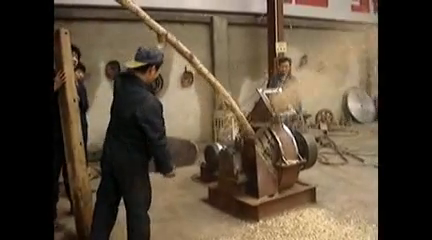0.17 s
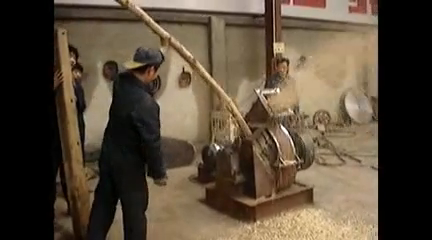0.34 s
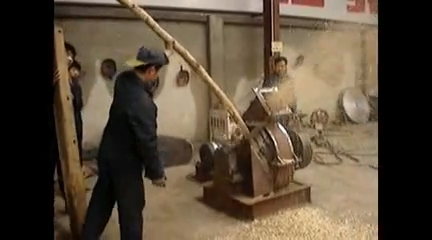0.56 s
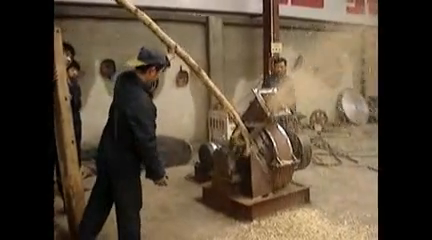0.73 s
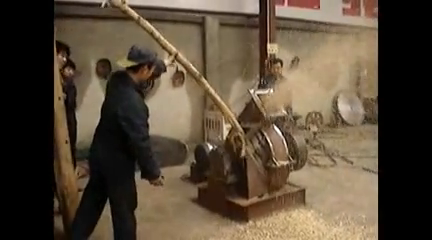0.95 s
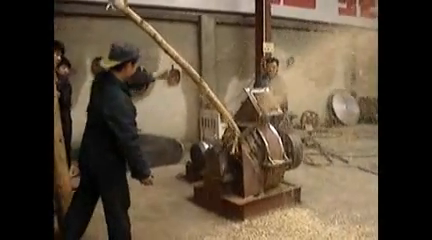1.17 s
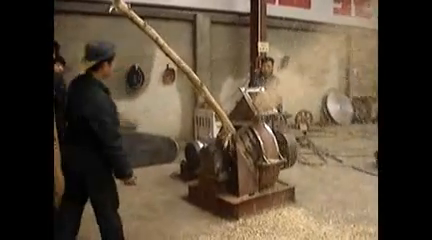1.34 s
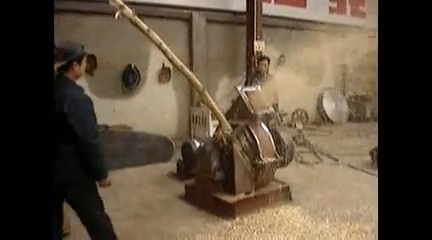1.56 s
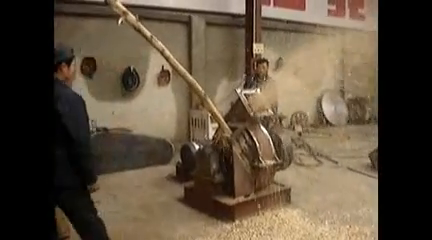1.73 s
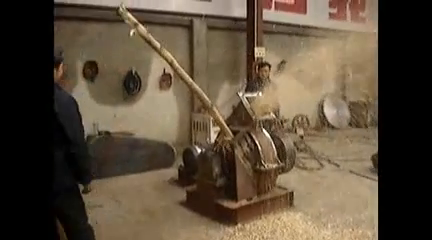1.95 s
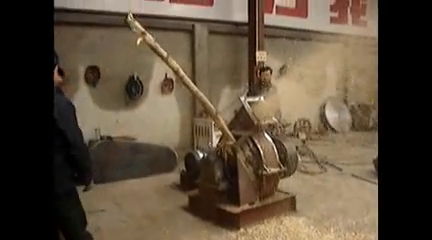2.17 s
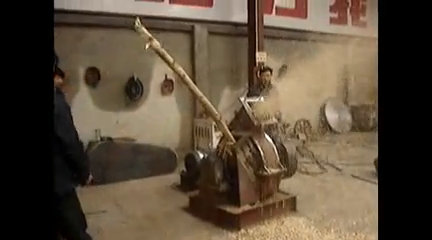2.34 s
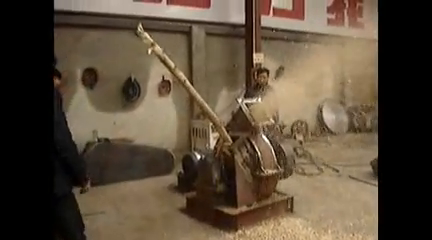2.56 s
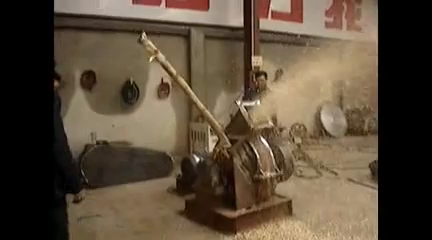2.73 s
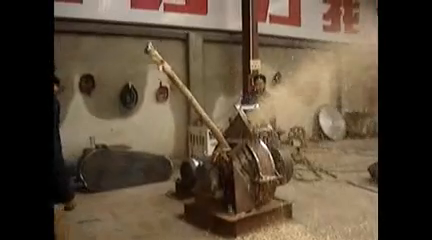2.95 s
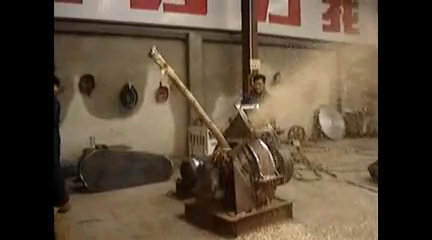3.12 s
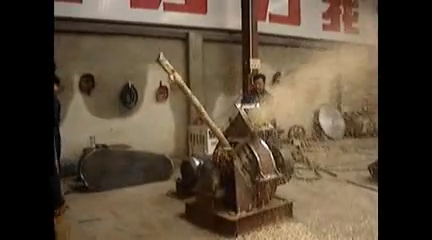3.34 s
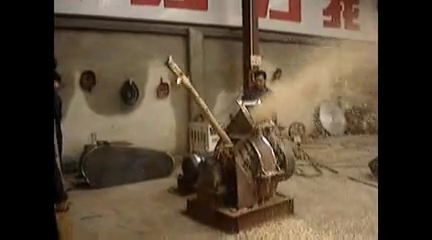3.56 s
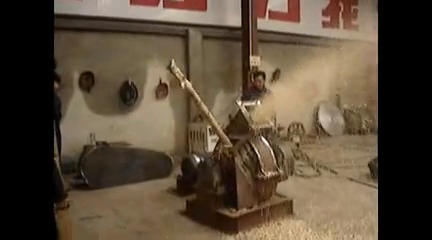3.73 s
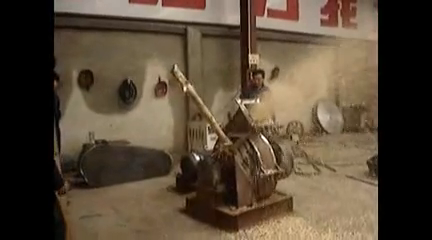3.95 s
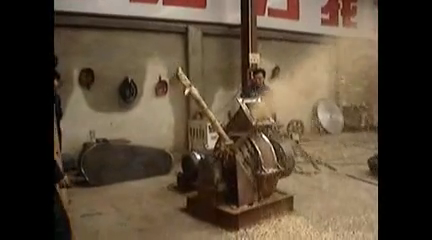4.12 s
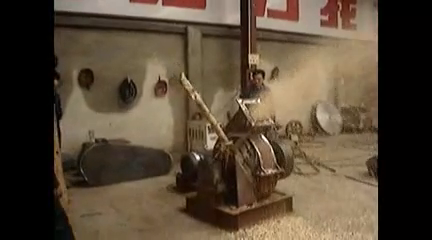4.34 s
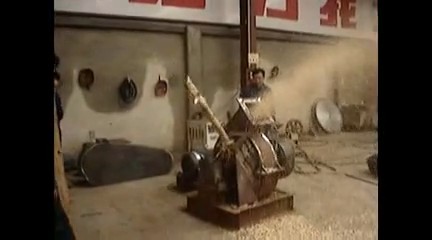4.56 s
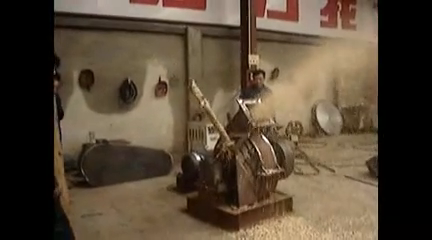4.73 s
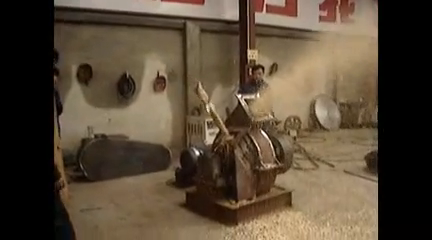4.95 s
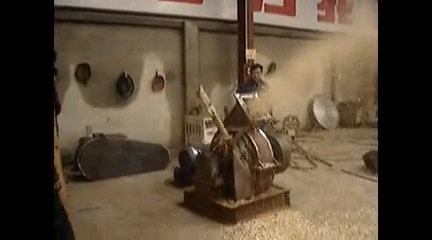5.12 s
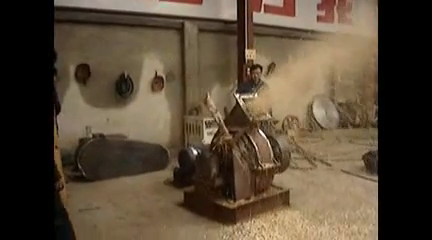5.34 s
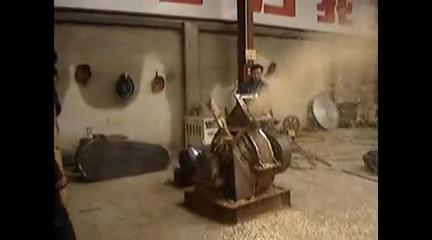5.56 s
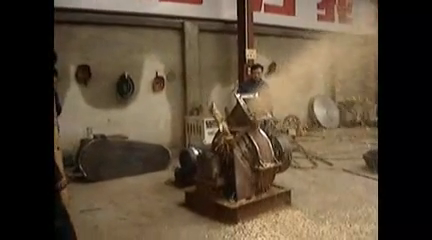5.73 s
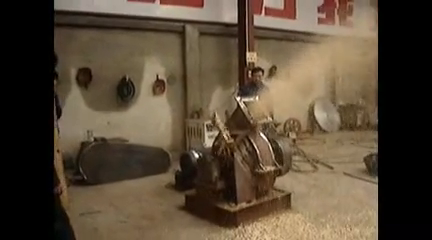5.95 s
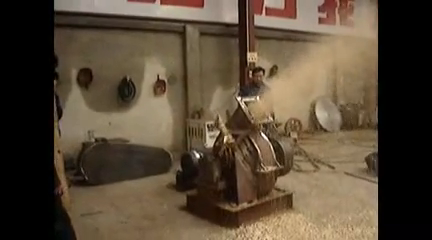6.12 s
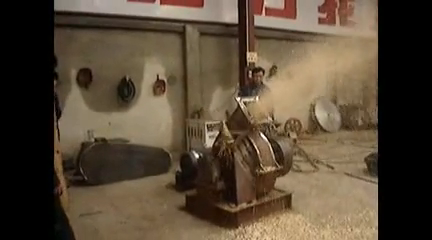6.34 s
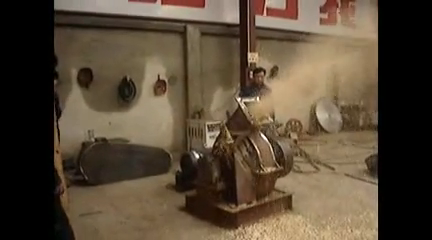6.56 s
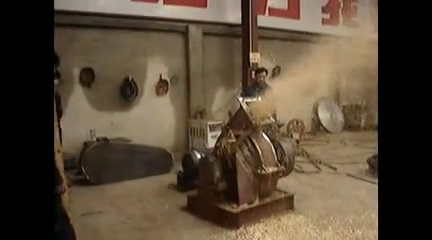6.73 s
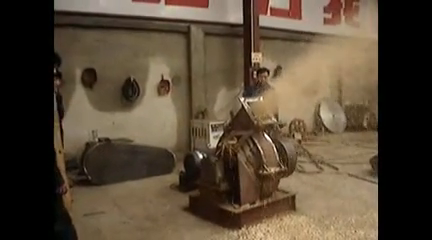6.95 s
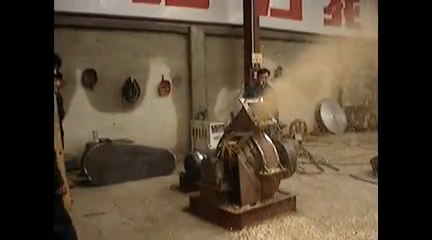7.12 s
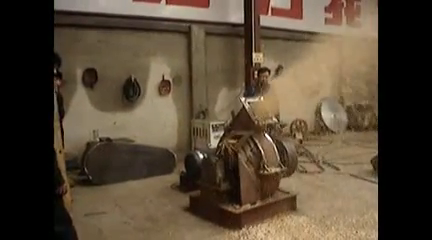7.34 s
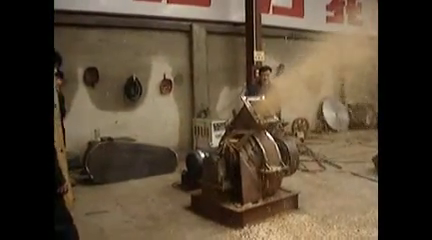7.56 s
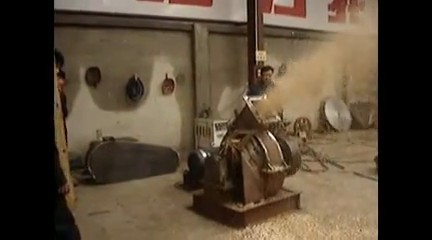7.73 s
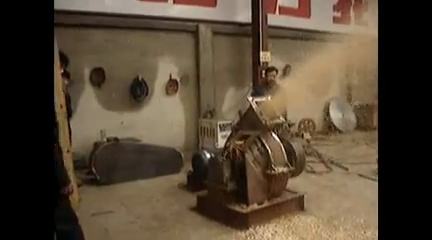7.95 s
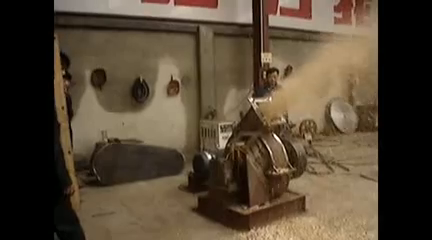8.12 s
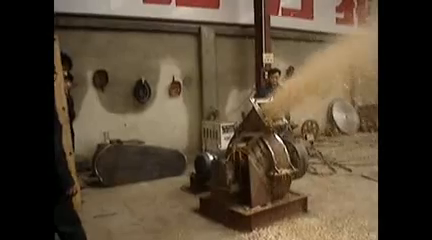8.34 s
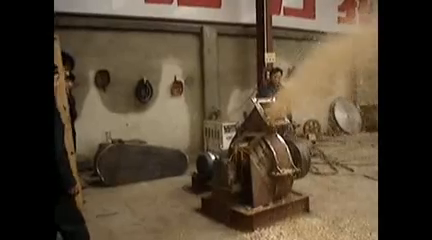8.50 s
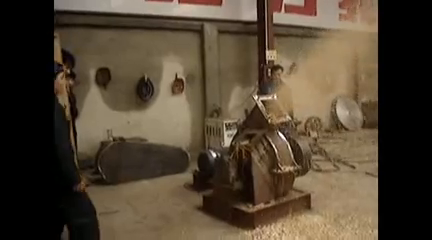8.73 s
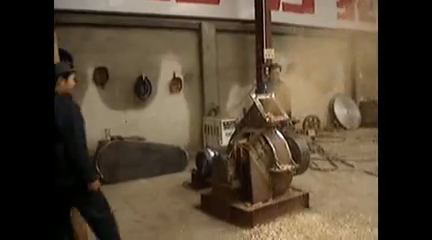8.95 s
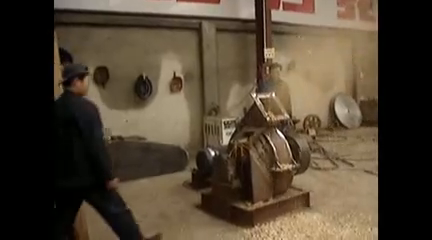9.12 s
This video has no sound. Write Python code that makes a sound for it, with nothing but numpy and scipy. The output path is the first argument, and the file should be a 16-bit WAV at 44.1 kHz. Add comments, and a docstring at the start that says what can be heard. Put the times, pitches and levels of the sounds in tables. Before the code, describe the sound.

From 0 s a large chipper is at full load, shredding a wooden pole: a loud, coarse, noisy grind chopped about 40 times a second, with a low throb and rumble beneath. Sharp cracks come thick and irregular until about 4.5 s, with crisp splinters spraying on steel. A thin whine near 1.1 kHz wavers, sagging slightly around 1 s and recovering by 3 s. From 3 to 5 s the pole groans with sliding, fuzzy resonances. Around 5-6.5 s chunks break in short ripping surges and cracks thin out. From 6.5 s the loose stub is batted round the ringing housing, about fourteen knocks a second, over a hollow drone and howl. Bright bursts cluster at 7.5-8.4 s, then cutting fades; quick light clanks run from 8.6 s as the disk speeds up to 9.3 s. Mono, a few metres away, echoing workshop, about one second of reverberation.

```python
"""In a workshop, a few metres from a mono microphone, a three-knife disk chipper eats a wooden pole.
Noise-like fibre fractures, pulsed by the knife passes and coloured by the steel housing, make the cutting.
Tones locked to the knife rate make the disk's drone; a gliding sine makes the motor's whine.
Near the end the loose stub is batted round the housing, the cutting fades and the disk speeds up."""
import sys
import numpy as np
from scipy import signal
from scipy.fft import rfft, irfft, next_fast_len
from scipy.io import wavfile
from scipy.ndimage import map_coordinates

SR = 44100
rng = np.random.default_rng(int(sys.argv[2]) if len(sys.argv) > 2 else 0)


def transcribe(signal):
    """Save signal, clipped to [-1, 1], as a 16-bit WAV file at the path in sys.argv[1]."""
    frames = np.atleast_2d(signal).T
    limited = np.clip(frames, -1, 1)
    pcm = np.round(limited * 32767).astype(np.int16)
    wavfile.write(sys.argv[1], SR, pcm)


N = 409248


def amp(db):
    """Amplitude ratio of a level in dB."""
    return 10 ** (np.asarray(db) / 20)


def unit(x):
    """x scaled to rms 1."""
    return x / np.sqrt(np.mean(x ** 2) + 1e-20)


def along(points, hz):
    """(Hz, value) points joined along a log frequency axis."""
    f, v = np.transpose(points)
    return np.interp(np.log(hz + 1), np.log(f + 1), v)


def curves(rows):
    """One value per sample for each column after the time."""
    s, *cols = np.transpose(rows)
    return [np.interp(np.arange(N) / SR, s, c) for c in cols]


def wobble(rate):
    """A smooth random curve with `rate` knots a second."""
    knots = rng.standard_normal(int(N * rate / SR) + 4)
    return map_coordinates(knots, [np.arange(N) * rate / SR])


def swells(rows, attack, release):
    """Sum of (start s, length s, height) bouts, each with a straight attack, a hold and a release."""
    t = np.arange(N) / SR
    total = np.zeros(N)
    for s, length, height in rows:
        rise = np.clip((t - s) / attack, 0, 1)
        fall = np.clip(1 - (t - s - length) / release, 0, 1)
        total += height * rise * fall
    return total


def bouts(rows, attack, release, rest_db):
    """Gain of a tone that rises from its resting level in (start s, length s, dB) bouts."""
    heights = [(s, length, amp(db)) for s, length, db in rows]
    return np.hypot(amp(rest_db), swells(heights, attack, release))


def add_at(track, s, sound):
    """Lay a short sound into the track at s seconds."""
    track[round(s * SR):][:len(sound)] += sound


def fuzzy(hz, width):
    """A resonance shaken at random: narrow noise around a steady or gliding frequency, rms 1."""
    phase = 2 * np.pi * np.cumsum(hz + np.zeros(N)) / SR
    return unit(wobble(width) * np.cos(phase) + wobble(width) * np.sin(phase))


def drone(passes, orders, waver_db, drift):
    """Lines on multiples of the knife rate, each wavering in level and phase in the turbulent air."""
    total = np.zeros(N)
    for k, db in orders:
        phase = 2 * np.pi * (k * passes + rng.random()) + drift * wobble(9)
        total += amp(db + waver_db * wobble(7)) * np.sin(phase)
    return total


def coloured(x, gain, size=16384):
    """Causal minimum-phase filter of unit energy with the given gain over frequency."""
    log_gain = np.log(np.maximum(gain(np.fft.rfftfreq(size, 1 / SR)), 1e-6))
    cepstrum = irfft(log_gain)
    # fold the cepstrum forward in time
    cepstrum[1:size // 2] *= 2
    cepstrum[size // 2 + 1:] = 0
    response = irfft(np.exp(rfft(cepstrum)))
    return signal.fftconvolve(x, response / np.linalg.norm(response))[:N]


# Reverberation of the workshop. Each row: frequency in Hz, time to fall 60 dB in seconds.
WORKSHOP_DECAY = [(150, 0.96), (1000, 1), (4000, 0.8), (9000, 1)]


def hall(x, wet_db, size=11025):
    """Direct sound plus the workshop's echo, redrawn every quarter second; the power stays about the same."""
    blocks = np.pad(x, (0, -N % size)).reshape(-1, size)
    hz, t, z = signal.stft(rng.standard_normal((len(blocks), SR // 2)), SR, nperseg=256)
    decay = amp(-60 * t / along(WORKSHOP_DECAY, hz)[:, None])
    tails = signal.istft(z * decay, SR, nperseg=256)[1]
    echo = np.zeros(N + 2 * SR)
    for i, answer in enumerate(signal.fftconvolve(blocks, tails, axes=1)):
        echo[i * size + SR // 200:][:len(answer)] += answer  # the echo starts 5 ms late
    wet = amp(wet_db) * np.std(x) * unit(echo[:N])
    return (x + wet) / np.hypot(1, amp(wet_db))


# Resonances of the steel housing. Each row: frequency in Hz, width in Hz, level in dB.
HOUSING_MODES = [(544, 62, 1), (587, 14, 2.5), (884, 66, -1), (1180, 19, -6), (1540, 230, 3),
                 (2296, 110, -4.5), (2850, 34, -7.5), (3120, 65, 4), (3300, 37, -3.5), (3640, 280, -2.5)]


def housed(x, spectrum, ring):
    """x takes a broad colour, and the housing's resonances stand out of it."""
    def gain(f):
        steel = sum(amp(db) / (1 + (2 * (f - hz) / width) ** 2) for hz, width, db in HOUSING_MODES)
        return amp(along(spectrum, f)) * (1 + ring * steel)
    return coloured(x, gain)


# Low rumble in the base frame. Each row: frequency in Hz, spectrum in dB per Hz.
RUMBLE_SPECTRUM = [(10, -11.5), (25, 3.5), (45, -10), (65, -13.5), (110, 1.5), (160, 7.5), (300, -23),
                   (600, -61.5)]
# The whine sags under load. Each row: time in seconds, pitch in Hz.
WHINE_PITCH_HZ = [(0, 1115), (.25, 1113), (.9, 1089), (1.2, 1087), (1.75, 1090), (2.2, 1094), (2.55, 1111),
                  (3, 1116), (9.28, 1113)]
# The whine swells in bouts. Each row: start in seconds, length in seconds, level in dB.
WHINE_BOUTS = [(-.05, 0.26, -34.5), (.3, 0.1, -41), (.52, .05, -43), (.61, 0.06, -35.5), (.72, .03, -38),
               (.8, 0.14, -32.5), (.99, 0.07, -34.5), (1.13, 0.16, -33.5), (1.33, .05, -36.5),
               (1.46, 0.25, -32), (1.79, 0.08, -40.5), (1.92, 0.08, -37), (2.04, .08, -34.5),
               (2.19, 0.08, -42), (2.29, .12, -37), (2.45, 0.43, -35.3), (2.92, 0.1, -39.5),
               (3.08, 0.33, -44), (3.5, 0.2, -36.5), (3.76, 0.38, -37), (4.14, 0.58, -43.5),
               (5.23, .08, -41), (6.05, 0.3, -44), (8.63, 0.035, -44), (8.09, 0.08, -37.5), (8.2, .38, -36)]
WHINE_ATTACK_S, WHINE_RELEASE_S, WHINE_REST_DB = 0.028, 0.097, -55
WHINE_CHOP = 0.099  # depth to which the knife passes chop the whine
WHINE_FRINGE_DB, WHINE_FRINGE_HZ = -18.5, 70.3  # its rough fringe: level re the tone, noise knots a second
MOTOR_ORDER = .73  # throbs of the shaft per knife pass


def motor(passes):
    """The loaded motor whines, roughened by the knife strokes; its shaft throbs and shakes the base frame."""
    pitch_hz, = curves(WHINE_PITCH_HZ)
    ragged = amp(.6 * wobble(22) + 1.5 * wobble(70))
    flutter = ragged * (1 + WHINE_CHOP * np.cos(2 * np.pi * (passes - .6)))
    tone = np.sin(2 * np.pi * np.cumsum(pitch_hz) / SR + 0.29 * wobble(30))
    tone += amp(WHINE_FRINGE_DB) * fuzzy(pitch_hz, WHINE_FRINGE_HZ)
    swell = bouts(WHINE_BOUTS, WHINE_ATTACK_S, WHINE_RELEASE_S, WHINE_REST_DB)
    whine = swell * flutter * tone
    throb = amp(-67.5 + 1.5 * wobble(5)) * np.sin(2 * np.pi * MOTOR_ORDER * passes)
    rumble = amp(-61.5) * coloured(rng.standard_normal(N), lambda f: amp(along(RUMBLE_SPECTRUM, f)))
    return whine + throb + rumble


# How hard the wood is pressed on the knives. Each row: time in seconds, effort in dB.
PRESSING_EFFORT = [(0, 2), (0.42, -1), (0.9, 2), (1.1, -0.5), (2.3, 0), (2.52, -2.5), (3.03, -1), (3.2, 1),
                   (3.95, -0.5), (4.25, 1), (4.85, 0.5), (5.0, -2.5), (6.1, -1), (6.52, -4), (6.65, -0.5),
                   (7.5, -1), (7.76, -1.5), (8.55, 2.5)]
# The frame answers the knife blows. Each row: multiple of the knife rate, level in dB.
FRAME_ORDERS = [(2, -15), (3, -6), (4, -6.5), (5, -6.5), (6, -2.5), (7, -4), (8, 0.5), (9, -4)]
FRAME_DB = -55  # at 0 dB effort
ENTRIES_END_S = 6.1  # the last snap of a knife entering the pole


def frame(passes):
    """The evenly spaced blows shake the base frame into a low, unsteady burr that fades after the last entry."""
    effort_db, = curves(PRESSING_EFFORT)
    held = np.clip(ENTRIES_END_S + 1 - np.arange(N) / SR, 0, 1)
    burr = drone(passes, FRAME_ORDERS, waver_db=1.5, drift=0.29)
    return held * amp(FRAME_DB + 0.78 * effort_db) * burr


# Loudness of the disk's drone. Each row: time in seconds, level in dB.
DRONE_LEVEL = [(0, -53.5), (2.35, -58.5), (3.3, -71), (3.85, -45), (4.2, -52), (6.45, -54), (6.65, -44.5),
               (7.8, -46), (8.25, -56), (8.5, -59)]
# Lines of the drone. Each row: multiple of the knife rate, level in dB.
DRONE_ORDERS = [(3, -22), (4, -10), (5, 0), (6, -4), (7, -10.5), (8, -7), (9, -1.5), (10, -16.5), (11, -11),
                (12, -4.5)]
# Air howls through the housing in bouts. Each row: start in seconds, length in seconds, level in dB.
HOWL_BOUTS = [(3.8, 0.19, -48), (7.0, 0.62, -46.5), (7.86, 0.2, -38), (8.25, 0.25, -47)]
HOWL_ATTACK_S, HOWL_RELEASE_S, HOWL_REST_DB = 0.055, 0.2, -60
# Lines of the howl. Each row: multiple of the knife rate, level in dB.
HOWL_ORDERS = [(12, 0), (14, -8), (21, -5.5)]
# Level of the disk's ringing, strongest around 8.15 s. Each row: time in seconds, level in dB.
RINGING_LEVEL = [(0, -56.5), (6.5, -63.5), (7.5, -60), (8.15, -47.5), (8.5, -56), (8.9, -57), (9.28, -51)]
# The disk's own modes. Each row: frequency in Hz, level in dB.
MODES_OF_DISK = [(495, -0.5), (661, -2.5), (868, 0), (1163, 0.5), (1985, -5), (2133, 0), (2347, -4),
                 (2510, -7.5), (2888, -10.5), (3297, -1), (3468, -4.5), (8015, -10)]
# Air rushing round the disk. Each row: frequency in Hz, spectrum in dB per Hz.
WINDAGE_SPECTRUM = [(300, -8.5), (600, 1), (2300, -1), (4500, -2), (8000, -1), (9000, -27.5)]
WINDAGE_DB = -52


def disk(passes):
    """The spinning disk drones, drives air through the housing and rings with its own modes."""
    hum = amp(curves(DRONE_LEVEL)[0]) * drone(passes, DRONE_ORDERS, waver_db=2.2, drift=0.22)
    howl_gain = bouts(HOWL_BOUTS, HOWL_ATTACK_S, HOWL_RELEASE_S, HOWL_REST_DB)
    howl = howl_gain * drone(passes, HOWL_ORDERS, waver_db=3.5, drift=0.26)
    modes = sum(amp(db) * fuzzy(hz, width=8 + .005 * hz) for hz, db in MODES_OF_DISK)
    ring = amp(curves(RINGING_LEVEL)[0]) * modes
    windage = amp(WINDAGE_DB) * housed(rng.standard_normal(N), WINDAGE_SPECTRUM, ring=0.34)
    return hum + howl + ring + windage


# The three knives stand out unequally. Each row: cutting force in dB, splinters in dB.
KNIFE_UNEVENNESS = [(0, 1), (-1.5, -3.5), (0, 1)]
KNIVES = 3


def knife_strokes(passes, knife_db, deepest, rise, fall, scatter_db):
    """Cutting force, rms 1: it builds to the deepest point of each pass and dies, unequally for each knife."""
    stroke = np.floor(passes).astype(int)
    count = np.arange(stroke[-1] + 1)
    size = amp(knife_db[count % KNIVES] + scatter_db * rng.standard_normal(len(count)))
    lag = passes - stroke - deepest
    return unit(size[stroke] * np.exp(np.minimum(lag / rise, -lag / fall)))


# The pole groans as it chatters in the chute. Each row: start in seconds, length in seconds,
# first pitch in Hz, last pitch in Hz, fuzziness in noise knots a second, level in dB.
POLE_GROANS = [(0.448, 0.46, 342, 299, 327, -40.5), (0.7, 0.79, 793, 765, 91, -45),
               (2.146, 0.436, 288.7, 261, 199, -44), (2.15, .35, 151.4, 136, 78, -57),
               (3.057, 1.36, 1318, 1493, 198.8, -42), (3.401, 0.85, 936, 870, 169.6, -38.5),
               (3.598, 0.42, 1154, 1253, 503, -45), (4.251, 0.7, 1333, 1517, 404, -46),
               (5.757, 0.44, 600, 690, 240.8, -41), (5.79, 0.11, 1510, 1485, 170, -40),
               (6.135, 0.25, 953, 1134, 400, -34), (6.169, .22, 1480, 1590, 231, -43),
               (6.489, 0.17, 1100, 1324, 189.5, -41.5), (6.599, .13, 1340, 1490, 190, -40),
               (6.901, 0.81, 638, 745.4, 352.4, -39)]


def groans(passes):
    """The knives shake the pole against the chute, and its resonance slides up or down."""
    t = np.arange(N) / SR
    sound = np.zeros(N)
    for s, length, first_hz, last_hz, width, db in POLE_GROANS:
        u = np.clip((t - s) / length, 0, 1)
        glide_hz = first_hz + u * (last_hz - first_hz)
        sound += amp(db) * np.sin(np.pi * u) * fuzzy(glide_hz, width)
    chatter = .25  # share of the power that follows the strokes
    force_db = np.transpose(KNIFE_UNEVENNESS)[0]
    force = knife_strokes(passes, force_db, deepest=.45, rise=0.13, fall=0.082, scatter_db=5.5)
    return sound * np.sqrt(1 - chatter + chatter * force ** 2)


SNAP_AT, SNAP_JITTER = .42, .04  # how far into its pass a knife splits the wood, and the spread (passes)
SNAP_SCATTER_DB = 0.5


def entries(passes):
    """(s, relative dB) of each knife's entry into the pole up to ENTRIES_END_S, stronger with effort."""
    stroke = np.arange(int(passes[-1]))
    chance = rng.standard_normal((len(stroke), 2))
    when = np.interp(stroke + SNAP_AT + SNAP_JITTER * chance[:, 0], passes, np.arange(N) / SR)
    level_db = np.transpose(KNIFE_UNEVENNESS)[0][stroke % KNIVES]
    level_db = level_db + np.interp(when, *np.transpose(PRESSING_EFFORT)) * .5
    level_db += SNAP_SCATTER_DB * chance[:, 1]
    return [(s, db) for s, db in zip(when, level_db) if s < ENTRIES_END_S]


# Treble ticks: base level, middle pitch, its relative spread, time to fall 20 dB
TICK_DB, TICK_HZ, TICK_SPREAD, TICK_S = -32, 6077, .11, 0.011
TREBLE_FADE_DB_PER_S = 0.82  # ticks and splinters slowly weaken as the pole shortens


def ticks(passes, count=3):
    """Short high-pitched ticks, a few at each knife stroke, at random pitches around 6 kHz."""
    t = np.arange(SR // 40) / SR
    onset = 1 - np.exp(-t / 0.0026)
    sound = np.zeros(N + SR)
    for s, db in entries(passes):
        for late, pitch, size in rng.standard_normal((count, 3)):
            level_db = TICK_DB + db + 2 * size - TREBLE_FADE_DB_PER_S * s - 20 * t / TICK_S
            hz = TICK_HZ * np.exp(TICK_SPREAD * pitch)
            tick = amp(level_db) * onset * np.sin(2 * np.pi * hz * t)
            add_at(sound, max(s + .0035 * late - .002, 0), tick)
    return sound[:N]


# The loudest splits of the pole. Each row: time in seconds, level of the crack in dB, of its splinters in dB.
LOUD_SPLITS = [(0.009, -19.5, -34.5), (0.057, -28, -35), (0.1335, -24.5, -34.5), (0.204, -28.5, -31),
               (0.2303, -36, -35.5), (0.577, -34, -27.5), (0.65, -27.5, -35), (0.7265, -24, -33),
               (0.75, -19.5, -37), (0.8754, -21.5, -29), (0.9, -19.5, -28), (0.955, -21.5, -29.5),
               (1.099, -35, -25.5), (1.228, -28, -39), (1.2517, -32, -29), (1.3282, -21, -24.5),
               (1.354, -24.5, -36.5), (1.404, -32, -29.5), (1.477, -23.5, -32), (1.778, -25.5, -26),
               (1.8074, -29, -34), (1.8538, -27, -33), (1.9312, -33, -33), (2.077, -26, -35),
               (2.177, -24, -36), (2.5725, -24, -41), (2.7193, -20, -31), (2.767, -27.5, -34),
               (2.814, -25, -30), (2.841, -24.5, -32), (3.1083, -31, -40), (3.4002, -22, -33.5),
               (3.4208, -30.5, -28), (3.472, -24.5, -36), (3.543, -23, -37), (3.616, -26.5, -44.5),
               (3.64, -27.5, -39), (3.688, -25, -40), (3.7627, -20, -34.5), (3.786, -24, -42),
               (3.8156, -22, -43.5), (3.836, -28, -40), (3.8598, -26, -32), (3.909, -25, -35),
               (4.0062, -24.5, -42), (4.0544, -22, -32.5), (4.3465, -25.5, -34.5), (4.514, -22.5, -41),
               (4.565, -26.5, -31), (5.1437, -31, -31.5), (5.2184, -29, -29)]
# Colour of splitting wood. Each row: frequency in Hz, spectrum in dB per Hz.
SPLIT_SPECTRUM = [(200, -10.5), (700, 1), (1500, 6.5), (2800, 1.5), (4000, -18), (7000, -15.5),
                  (9300, -30.5)]
# Colour of splinters on the steel. Each row: frequency in Hz, spectrum in dB per Hz.
SPLINTER_SPECTRUM = [(2500, -16), (3700, 3.5), (4500, 3.5), (6000, 0.5), (7200, -0.5), (8200, -3),
                     (8800, -9), (9300, -36)]
SPLIT_S, SPLIT_ATTACK_S = 0.006, .0006  # time to fall 20 dB, rise time
SNAP_DB, SNAP_S = -34.5, 0.0043  # small split at every knife entry: base level, time to fall 20 dB


def splits(passes):
    """Every knife enters with a snap; now and then a whole bundle of fibres gives way in one sharp crack."""
    t = np.arange(SR // 30) / SR
    wood, spray = np.zeros((2, N + SR))
    for s, db in entries(passes):
        add_at(wood, s, amp(SNAP_DB + db - 20 * t / SNAP_S))
    burst = (1 - np.exp(-t / SPLIT_ATTACK_S)) * amp(-20 * t / SPLIT_S)
    for s, db, splinter_db in LOUD_SPLITS:
        add_at(wood, s, amp(db) * burst)
        add_at(spray, s, amp(splinter_db) * burst)
    crack = housed(wood[:N] * rng.standard_normal(N), SPLIT_SPECTRUM, ring=0.3)
    splinters = housed(spray[:N] * rng.standard_normal(N), SPLINTER_SPECTRUM, ring=.2)
    return hall(crack + splinters, wet_db=-5)


def fractures(per_second, spread_db):
    """Fibres snapping at random moments with widely scattered sizes, rms 1."""
    snaps = rng.random(N) < per_second / SR
    return unit(snaps * rng.standard_normal(N) * amp(spread_db * rng.standard_normal(N)))


# A scrap of the stub is struck against bare steel. Each row: time in seconds, level in dB.
SCRAP_CLANKS = [(8.643, -28.5), (8.718, -37.5), (8.789, -32.5), (8.86, -32.5), (8.932, -33), (9.004, -36.5),
                (9.075, -45), (9.145, -38.5), (9.214, -37)]
# Colour of the clank. Each row: frequency in Hz, spectrum in dB per Hz.
CLANK_SPECTRUM = [(200, -24), (600, 4.5), (1000, -3), (1500, -4), (2200, 6.5), (3300, -1), (4200, -2),
                  (5500, -5.5), (8000, -42.5)]
# Time to fall 20 dB, rise time, how far the disk's modes stand out
CLANK_S, CLANK_ATTACK_S, CLANK_RING_DB = 0.094, 0.0026, 9


def clanks():
    """The disk clanks at every touch of the scrap: short noise bursts with its modes standing out."""
    t = np.arange(SR // 3) / SR
    onset = 1 - np.exp(-t / CLANK_ATTACK_S)
    rattle = np.zeros(N + SR)
    for s, db in SCRAP_CLANKS:
        add_at(rattle, s, amp(db - 20 * t / CLANK_S) * onset)

    def gain(f):
        modes = sum(amp(CLANK_RING_DB + db) / (1 + ((f - hz) / (0.0073 * hz)) ** 2) for hz, db in MODES_OF_DISK)
        return amp(along(CLANK_SPECTRUM, f)) * np.hypot(1, modes)
    return hall(coloured(rattle[:N] * fractures(9000, spread_db=3.5), gain), wet_db=-9)


RUNS_LOW_S = 8.15  # the supply of wood runs low; from here the cutting sounds fade


def low_for(t):
    """Seconds since the supply of wood began to run low."""
    return np.maximum(t - RUNS_LOW_S, 0)


# Once a turn the proudest knife bats the loose stub. Each row: time in seconds, relative level in dB.
BATTING_LEVEL = [(6.55, -15), (6.67, -14.5), (6.85, -22), (7.04, -15.5), (7.2, -14), (7.4, -15),
                 (7.7, -19.5), (8.35, -22), (8.6, -23)]
PROUD_KNIFE = 2.3  # passes into a turn at which the proudest knife strikes


def batting(passes):
    """(s, relative dB) of one blow per turn of the disk over the time that BATTING_LEVEL spans."""
    when, level_db = np.transpose(BATTING_LEVEL)
    turns = np.interp(np.arange(PROUD_KNIFE, passes[-1], KNIVES), passes, np.arange(N) / SR)
    return [(s, np.interp(s, when, level_db)) for s in turns if when[0] < s < when[-1]]


CLANG_DB, CLANG_T60_S = -32.5, 0.19  # the disk's modes after each blow: level re the blow, time to fall 60 dB


def clangs(blows):
    """Every blow of the wood rings the disk's modes, each time in a new balance."""
    t = np.arange(SR // 3) / SR
    hz, mode_db = np.transpose(MODES_OF_DISK)[:, :, None]
    sound = np.zeros(N + SR)
    for s, db in blows:
        size, turn = rng.standard_normal((2, len(hz), 1))
        modes = amp(mode_db + 4.3 * size) * np.sin(2 * np.pi * (hz * t + turn))
        add_at(sound, s, amp(CLANG_DB + db - 60 * t / CLANG_T60_S) * modes.sum(axis=0))
    return sound[:N]


# Further single knocks of the wood on steel, hard and soft, some out of step.
# Each row: time in seconds, relative level in dB.
SINGLE_KNOCKS = [(4.7805, -18), (5.0734, -17), (6.4058, -16.5), (6.745, -25.5), (6.9633, -24), (7.109, -30),
                 (7.8097, -18), (8.0035, -14.5), (8.079, -13), (8.102, -15), (8.2242, -14), (8.2494, -20),
                 (8.3995, -16.5), (8.424, -25)]
# Colour of the wood knocking on steel. Each row: frequency in Hz, spectrum in dB per Hz.
STUB_SPECTRUM = [(100, -22.5), (400, -10.5), (600, 0), (1300, -1.5), (2400, -2.5), (3500, 2), (4300, -0.5),
                 (5500, -1), (7000, -6), (8300, -36.5), (9300, -57)]
# Colour of tearing fibres. Each row: frequency in Hz, spectrum in dB per Hz.
TEAR_SPECTRUM = [(900, -32), (1600, -1.5), (2000, 1.5), (2700, 1.5), (3500, -5), (4200, -17.5), (6000, -61)]
KNOCK_DB, RASP_DB = -15.0, -20.5  # body of each blow, its torn fibres
CRACK_DB, CRACK_FALL_DB_PER_S = -24.5, 35  # splinters re the blow, and their fall once the wood runs low


def stub(passes, length=0.083, attack=0.0023, crack_s=0.088):
    """Each blow of the wood throws a burst of fragments against the ringing steel."""
    t = np.arange(SR // 3) / SR
    onset = 1 - np.exp(-t / attack)
    # length and crack_s are the times to fall 20 dB
    burst, spray = amp(-20 * t / length) * onset, amp(-20 * t / crack_s) * onset
    body, edge = np.zeros((2, N + SR))
    blows = batting(passes) + SINGLE_KNOCKS
    for s, db in blows:
        add_at(body, s, amp(db) * burst)
        add_at(edge, s, amp(db + CRACK_DB - CRACK_FALL_DB_PER_S * low_for(s)) * spray)
    knock = amp(KNOCK_DB) * housed(body[:N] * fractures(9000, spread_db=3.5), STUB_SPECTRUM, ring=0.61)
    rasp = amp(RASP_DB) * housed(body[:N] * fractures(12000, spread_db=6.0), TEAR_SPECTRUM, ring=.6)
    crack = housed(edge[:N] * fractures(20000, spread_db=0.0), SPLINTER_SPECTRUM, ring=.2)
    return hall(knock + rasp + crack + clangs(blows), wet_db=-1.5)


# How firmly the knives bite; the rest is chips tumbling in the housing. Each row: time in seconds, bite from 0 to 1.
KNIFE_BITE = [(0, 0.58), (2, 0.6), (3, 0.6), (4.4, 0.51), (5.2, 0.44), (6.2, 0.44), (7.2, 0.55),
              (7.9, 0.48), (8.6, 0.67), (9.28, 0.7)]
# A chunk breaks off and is shredded at once. Each row: start in seconds, length in seconds,
# extra tearing in dB, extra splinters in dB.
CHUNK_SURGES = [(0.724, 0.14, 0, 0), (2.726, 0.13, 3.5, 1.5), (3.129, 0.15, 3, 0.5),
                (3.761, 0.18, 2.5, -0.5), (4.453, 0.1, 3, -3), (4.736, 0.14, 2, 1), (5.151, 0.16, 4.5, 3),
                (5.361, 0.1, 3, 2.5), (5.776, 0.36, 2, 1.5), (6.213, 0.11, 2, 1.5), (6.594, 0.17, 0, 0.5),
                (7.562, 0.091, 6, 6.5), (7.81, 0.15, 4.5, 2), (7.996, 0.061, 5.5, 10.5),
                (8.055, 0.071, 9, 8), (8.211, 0.05, 11, 13), (8.269, 0.024, 1, 2), (8.379, 0.22, 2.5, 6)]
SURGE_ATTACK_S, SURGE_RELEASE_S = 0.021, 0.038
SURGE_BLUR = 0.57  # shredding fills the gaps between strokes: dB of pulsing share lost per dB of splinter surge
# Colour of the thud. Each row: frequency in Hz, spectrum in dB per Hz.
THUD_SPECTRUM = [(25, -45), (60, -36), (100, -26), (150, -9.5), (250, -1), (330, 0), (420, -1.5),
                 (520, -14), (900, -49.5)]
# Colour of the grinding. Each row: frequency in Hz, spectrum in dB per Hz.
GRIND_SPECTRUM = [(250, -28.5), (420, -16), (520, -1), (800, 0), (1100, 1), (1550, -3), (1900, -10.5),
                  (3000, -49)]
THUD_DB, GRIND_DB, TEAR_DB, SPLINTER_DB = -46.5, -35.5, -38.5, -39.5  # base levels at 0 dB effort
THUD_DB_PER_BITE = 21  # a loosely held pole thumps more
# Once the wood runs low each sound of the cut fades at its own rate
THUD_FALL_DB_PER_S, GRIND_FALL_DB_PER_S, TEAR_FALL_DB_PER_S, SPLINTER_FALL_DB_PER_S = 7.5, 8.5, 6, 32.5


def cutting(passes):
    """Each stroke breaks fibres; between strokes the chips keep rattling through the housing."""
    effort_db, = curves(PRESSING_EFFORT)
    bite, = curves(KNIFE_BITE)
    tearing = [(s, length, db) for s, length, db, _ in CHUNK_SURGES]
    spraying = [(s, length, db) for s, length, _, db in CHUNK_SURGES]
    surge_db = swells(tearing, SURGE_ATTACK_S, SURGE_RELEASE_S)
    spray_db = swells(spraying, SURGE_ATTACK_S, SURGE_RELEASE_S)
    t = np.arange(N) / SR
    low_s = low_for(t)
    force_db, flung_db = np.transpose(KNIFE_UNEVENNESS)
    cut = knife_strokes(passes, force_db, deepest=0.46, rise=0.27, fall=0.6, scatter_db=0.4)
    flung = knife_strokes(passes, flung_db, deepest=.39, rise=0.19, fall=0.5, scatter_db=.8)

    def pulsing(force, depth):
        """Gain that follows the strokes by a share of the power and is steady for the rest."""
        share = np.clip(depth * bite, 0, 1) * amp(-SURGE_BLUR * np.abs(spray_db))
        return np.sqrt(share * force ** 2 + 1 - share)

    thud_db = THUD_DB + 0.55 * effort_db - THUD_DB_PER_BITE * (bite - bite.mean())
    thud_db += wobble(7.7) - THUD_FALL_DB_PER_S * low_s
    grind_db = GRIND_DB + effort_db + 0.13 * surge_db + wobble(9) - GRIND_FALL_DB_PER_S * low_s
    tear_db = TEAR_DB + 0.48 * effort_db + surge_db + 0.27 * wobble(8.2) - TEAR_FALL_DB_PER_S * low_s
    splinter_db = SPLINTER_DB + 0.17 * effort_db + spray_db - SPLINTER_FALL_DB_PER_S * low_s
    splinter_db -= TREBLE_FADE_DB_PER_S * np.minimum(t, ENTRIES_END_S)

    thud = housed(pulsing(cut, 0.52) * fractures(3000, spread_db=3.0), THUD_SPECTRUM, ring=.2)
    grind = housed(pulsing(cut, 0.89) * fractures(7000, spread_db=2.5), GRIND_SPECTRUM, ring=0.19)
    tear = housed(pulsing(cut, 1.0) * fractures(9000, spread_db=2.5), TEAR_SPECTRUM, ring=0.39)
    splinter = housed(pulsing(flung, 1.22) * fractures(20000, spread_db=4.5), SPLINTER_SPECTRUM, ring=0.14)
    low = hall(amp(thud_db) * thud + amp(grind_db) * grind, wet_db=-1)
    return low + hall(amp(tear_db) * tear, wet_db=-7.5) + hall(amp(splinter_db) * splinter, wet_db=-9.5)


# The disk sags under load and races at the end. Each row: time in seconds, knife passes per second.
DISK_SPEED = [(0.0, 41.171), (0.5, 40.211), (1.0, 39.751), (1.5, 39.777), (2.0, 40.258), (2.5, 40.913),
              (3.0, 41.134), (4.0, 41.088), (4.5, 41.283), (5.0, 41.273), (5.5, 41.336), (6.0, 41.162),
              (6.5, 41.148), (7.5, 41.28), (8.0, 41.034), (8.5, 40.67), (9.28, 43.179)]


def scene():
    """Machine and wood share the disk's count of knife passes; both channels are alike."""
    passes = np.cumsum(curves(DISK_SPEED)[0]) / SR
    machine = motor(passes) + frame(passes) + disk(passes)
    pole = groans(passes) + ticks(passes) + splits(passes) + cutting(passes)
    loose_wood = clanks() + stub(passes)
    heard = machine + pole + loose_wood
    return np.array([heard, heard])


TOP_HZ = 9300


def record(dry):
    """The microphone's channel keeps nothing above its band limit."""
    m = next_fast_len(N + SR // 2)
    passband = np.fft.rfftfreq(m, 1 / SR) < TOP_HZ
    return irfft(rfft(dry, m) * passband, m)[:, :N]


dry = scene()
out = record(dry)
transcribe(out)
```